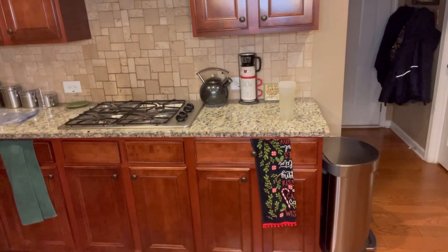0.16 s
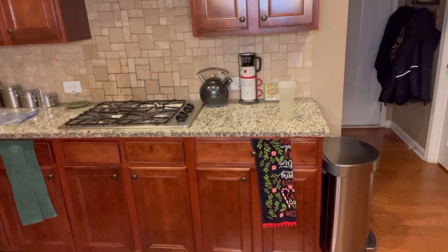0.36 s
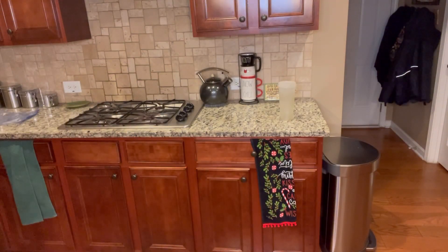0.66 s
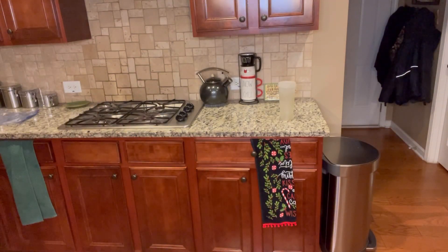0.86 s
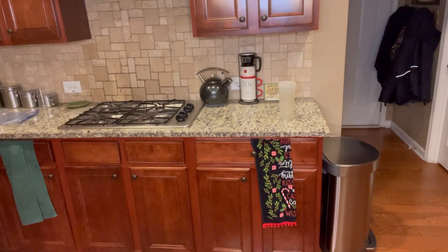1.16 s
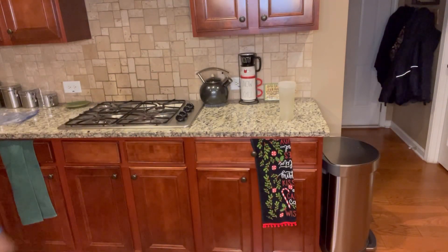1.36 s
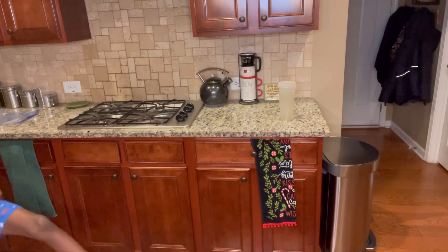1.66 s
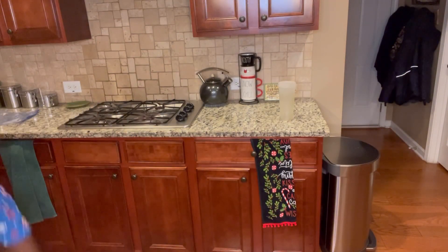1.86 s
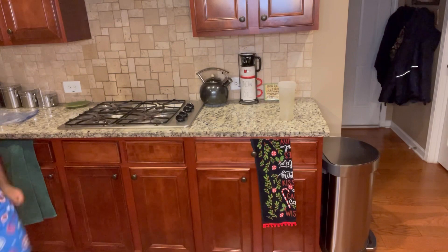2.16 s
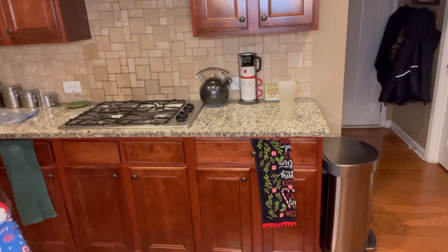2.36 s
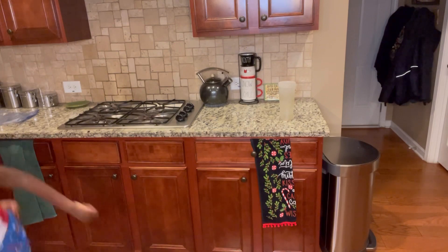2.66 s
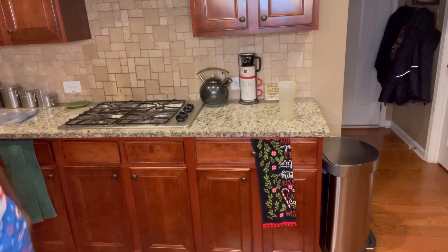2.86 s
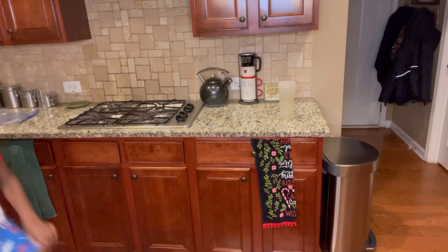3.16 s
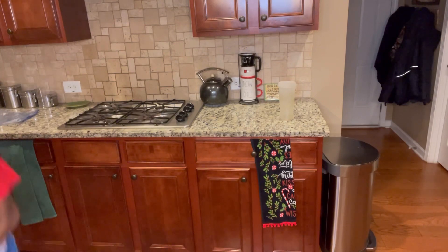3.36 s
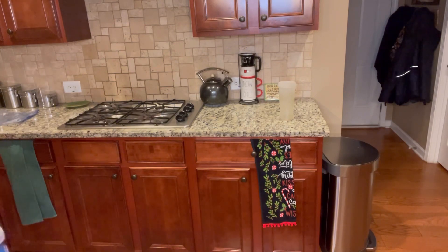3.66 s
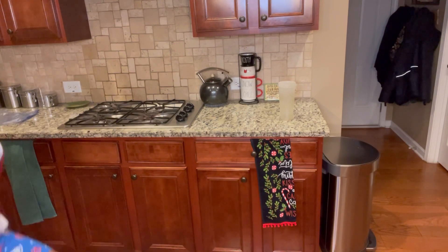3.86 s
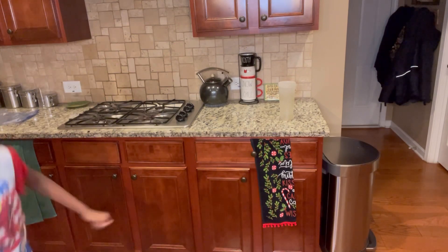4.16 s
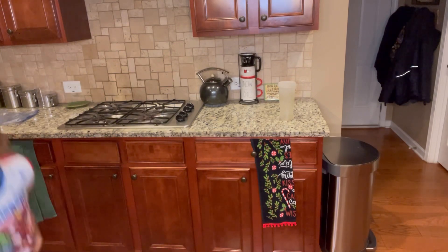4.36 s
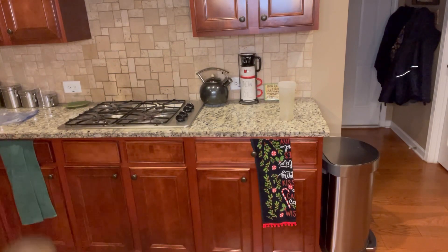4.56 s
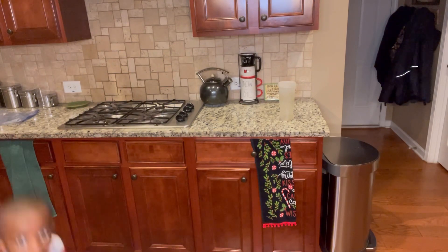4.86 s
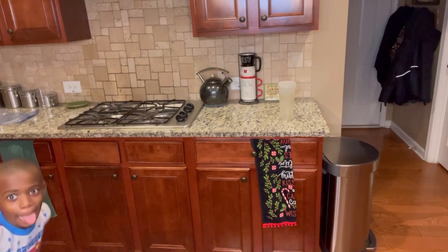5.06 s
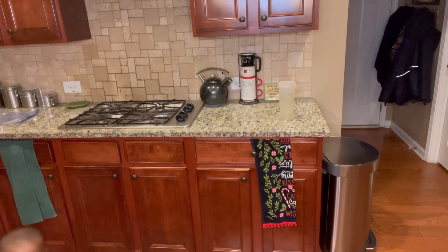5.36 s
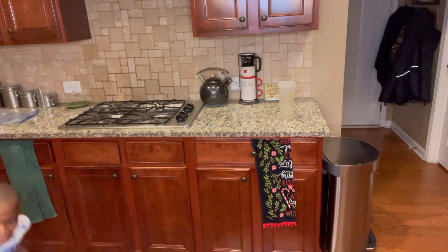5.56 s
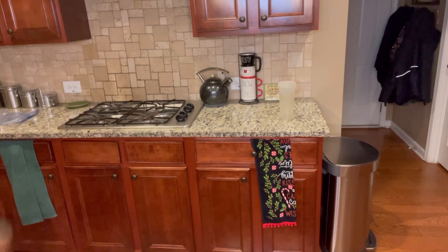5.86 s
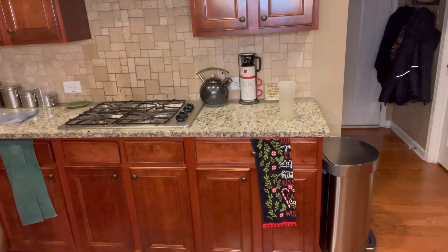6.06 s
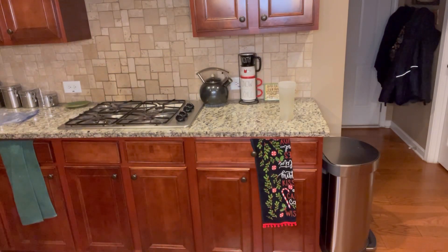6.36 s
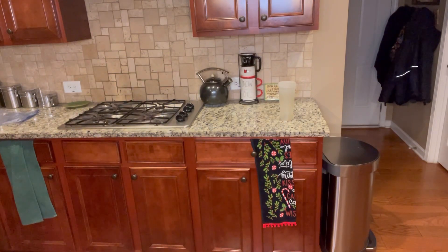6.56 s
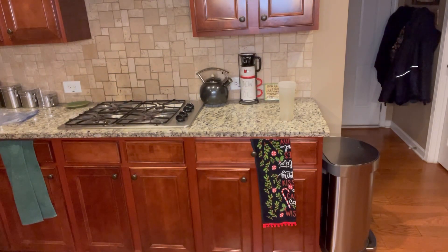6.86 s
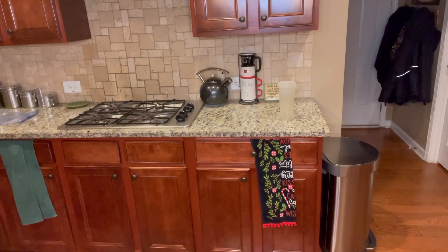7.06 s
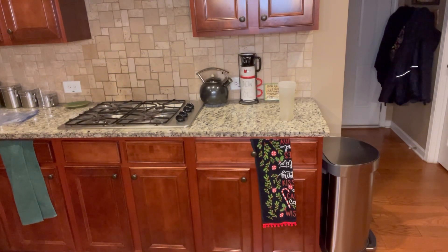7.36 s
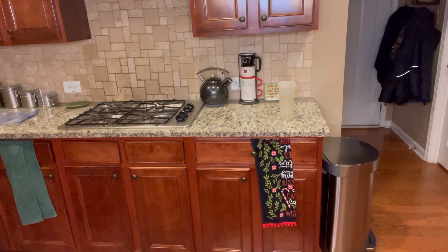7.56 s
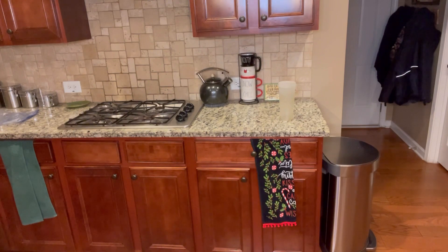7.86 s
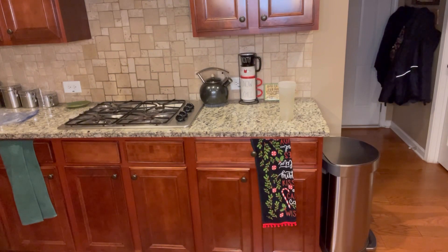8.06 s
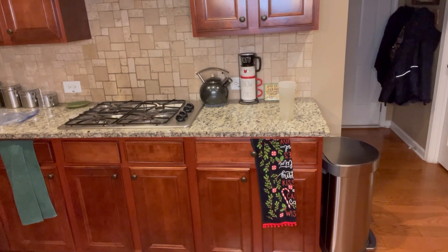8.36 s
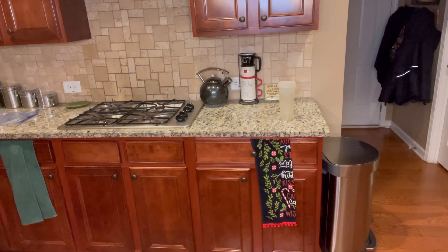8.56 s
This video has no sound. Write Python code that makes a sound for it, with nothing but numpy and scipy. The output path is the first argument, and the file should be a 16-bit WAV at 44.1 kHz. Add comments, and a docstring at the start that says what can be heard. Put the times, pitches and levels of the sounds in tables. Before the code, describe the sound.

In a hard tiled kitchen, wooden cupboard doors clack and tap unevenly while a drawer rumbles and cloth or packets rustle. Feet thud on floorboards. Knocks become closer and louder, peaking around the middle, then thin out into faint rubs and shuffles. Near the end a heavy door slams with a low boom and quick rebounds. Close phone-like stereo pickup with short bright room echoes.

```python
"""Low kitchen cupboards are searched near a phone, in a hard tiled room that echoes every blow as decaying noise.
From the start wooden doors clack amid bright hollow taps and scrapes, all ringing modes; a drawer rumbles in noise.
Cloth and packets rustle as brighter noise; then feet thud on floorboards, boards ringing under a softer attack.
From 1.5 s solid door edges knock close by; the clacks peak near 4 s, hollow sounds rub near 5.3 s and ring faintly
down near 6.3 s, and near 8 s a heavy door slams. A low tone comes and goes over dark noise: shuffles and house hush."""
import sys
import numpy as np
from scipy import signal
from scipy.fft import rfft, irfft, next_fast_len
from scipy.io import wavfile
from scipy.ndimage import uniform_filter1d, map_coordinates

SR = 44100
rng = np.random.default_rng(int(sys.argv[2]) if len(sys.argv) > 2 else 0)


def makeup_ratio(level_db):
    """Linear amplitude ratio for a level in decibels (20 dB per factor of ten)."""
    decades = np.asarray(level_db, float) / 20
    return 10 ** decades


def wav_record(signal):
    """Record a signal, one row per channel, as 16-bit PCM in the file named by sys.argv[1]."""
    frames = np.transpose(np.atleast_2d(signal))
    bounded = np.clip(frames, -1, 1)
    # unit amplitude maps onto the largest positive 16-bit level
    quanta = np.round(bounded * 32767).astype(np.int16)
    wavfile.write(sys.argv[1], SR, quanta)


N = 384552  # samples in the scene


def unit(x):
    """Scaled to rms 1."""
    return x / np.sqrt(np.mean(x ** 2) + 1e-20)


def along(points, hz):
    """Reads a curve of (frequency [Hz], value) points on a log frequency axis."""
    f, v = np.transpose(points)
    return np.interp(np.log(hz + 1), np.log(f + 1), v)


def wobble(rate):
    """A smooth random curve with rate knots a second."""
    knots = rng.standard_normal(int(N * rate / SR) + 4)
    return map_coordinates(knots, [np.arange(N) * rate / SR])


def filtered(x, response):
    """Filters x by a complex response of frequency."""
    m = next_fast_len(x.shape[-1] + 8192)
    spectrum = rfft(x, m) * response(np.fft.rfftfreq(m, 1 / SR))
    return irfft(spectrum, m)[..., :x.shape[-1]]


def ring(modes, centre_hz, spread, attack, t):
    """Modes near the struck spot's pitch ring most; strengths, phases and pitches are new each blow; peak 1."""
    hz, db, t60 = np.transpose(modes)[:, :, None]
    strength, phase, pitch = rng.standard_normal((3, len(modes), 1))
    db = db + 2 * strength - np.abs(spread) * np.log2(hz / centre_hz) ** 2
    hz = hz * (1 + 0.03 * pitch)  # loose parts never ring at quite the same pitch twice
    partials = makeup_ratio(db - 60 * t / t60) * np.sin(2 * np.pi * hz * t + phase)
    x = np.sum(partials, axis=0) * (1 - np.exp(-t / attack))
    return x / np.abs(x).max()


# colour of a hard contact: (frequency [Hz], level [dB per Hz])
CONTACT_COLOUR = [(530, -41), (900, -12), (1040, -6.5), (1600, -15), (2000, -16.5), (3080, -19),
                  (4960, -20), (6500, -22), (8000, -23), (13500, -34.5), (15600, -46)]


def crack(t60, tilt_db, t):
    """Hard contact: a sharp tick amid fading splinters, tilted in dB per octave above 1.2 kHz; peak 1."""
    ticks = rng.standard_normal(len(t)) ** 3 * makeup_ratio(-60 * t / t60) * .07
    ticks[24] += 1

    def colour(hz):
        tilt = tilt_db * np.log2(np.maximum(hz, 1200) / 3000)
        low_cut = 1 + (700 / (hz + 1)) ** 4
        return makeup_ratio(along(CONTACT_COLOUR, hz) + tilt) / low_cut

    x = filtered(ticks, colour)
    return x / np.abs(x).max()


# decay of the tiled room: (frequency [Hz], t60 [s])
ROOM_DECAY = [(60, .24), (120, .5), (250, .55), (1300, .68), (5000, .6), (11000, .38)]


def room(x, early_db):
    """Two unrelated echoes of one blow: near cabinet faces answer fast, then each frequency dies at its own speed."""
    hz, t, z = signal.stft(rng.standard_normal((2, int(.58 * SR))), SR, nperseg=256)
    late = makeup_ratio(-60 * t / along(ROOM_DECAY, hz)[:, None])
    late /= np.linalg.norm(late, axis=1, keepdims=True)  # equal energy at every pitch
    early = makeup_ratio(-60 * t / 0.057)
    early /= np.linalg.norm(early)
    tail = signal.istft(z * (late + makeup_ratio(early_db) * early), SR, nperseg=256)[1]
    delayed = np.pad(x, (150, 0))[None]
    return signal.fftconvolve(delayed, tail / np.linalg.norm(tail[0]), axes=1)


def place(out, s, hit, echo):
    """Adds one blow at s seconds: direct sound on track 0, its two echoes on tracks 1 and 2."""
    start = round(s * SR)
    out[0, start:][:len(hit)] += hit
    out[1:, start:][:, :echo.shape[1]] += echo


# cabinet and floor boom: (frequency [Hz], level [dB], t60 [s])
CARCASS_MODES = [(52, -11, 0.12), (64.7, -0.5, 0.2), (97, -2, 0.11), (121.5, 2, 0.14), (165, 1, 0.07)]
FLOOR_HZ, FRAME_HZ = 135, 64.4  # where floor and cabinet frame boom


def blows(rows, modes, damping, click_t60, attack, boom_attack, spread, early_db, click_room_db):
    """Struck wood: contact click, ringing panel and carcass boom, each blow with two room answers.

    Rows: (time [s], click [dB], wood [dB], boom [dB], click tilt [dB per octave], room [dB], wood [Hz], boom [Hz]).
    """
    out, t = np.zeros((3, N + 2 * SR)), np.arange(SR // 4) / SR
    damped = np.array(modes) / [1, 1, damping]  # shortens every t60
    for s, click_db, wood_db, boom_db, tilt_db, wet_db, wood_hz, boom_hz in rows:
        click = makeup_ratio(click_db) * crack(click_t60, tilt_db, t)
        body = makeup_ratio(wood_db) * ring(damped, wood_hz, spread, attack, t)
        body += makeup_ratio(boom_db) * ring(CARCASS_MODES, boom_hz, 9.2, boom_attack, t)
        echo = makeup_ratio(wet_db) * room(body + makeup_ratio(click_room_db) * click, early_db)
        place(out, s, body + click, echo)
    return out[:, :N]


# wooden panels and boards, also rung by knocks and feet: (frequency [Hz], level [dB], t60 before damping [s])
WOOD_MODES = [(215, -4.5, 0.13), (272, -7, 0.14), (312, -4, 0.16), (385, -4, 0.07), (455.3, -1.5, 0.076),
              (545, -7, 0.086), (578, 2, 0.03), (679.5, 0, 0.053), (779, 9.5, 0.02), (864, 9, 0.013),
              (994, -5.5, 0.085), (1120, -5.5, 0.019), (1260, -0.5, 0.023), (1480, 20.5, 0.012),
              (1700, -5, 0.029), (2050, -9.5, 0.013), (2390, 3.5, .012), (2900, 12.5, .01)]
# door and catch contacts: (time [s], click level [dB], panel level [dB], panel centre [Hz],
# click tilt [dB per octave])
DOOR_CLACKS = [(0.104, -56, -45, 826, 2.5), (0.14, -39, -37, 694, 12), (0.294, -18, -35, 664, -5.5),
               (0.4066, -57, -30, 336, 0), (0.4455, -19, -29, 654, -1), (0.4555, -28, -26.5, 800, -4),
               (0.4951, -20.5, -31, 568, -2), (0.551, -34, -31, 700, -7), (0.6376, -26, -30, 405, -3.5),
               (0.655, -26, -30.5, 384, -7), (0.7019, -20, -29, 1500, -9), (1.1127, -22.5, -58.5, 598, 4),
               (1.348, -39, -60, 420, 5.5), (1.464, -30.5, -40, 864, -9.5), (1.667, -40, -60, 600, -2),
               (1.687, -30, -34.5, 690, -1), (1.699, -43, -39, 450, -4), (1.8112, -48, -56, 450, 5),
               (2.163, -43, -57, 433, 0), (2.1997, -55, -50, 595, -7), (2.485, -26.5, -63, 685, -2),
               (2.646, -32.5, -37.5, 500, -7.5), (2.84, -28.5, -46, 403, -2.5),
               (3.0795, -31.5, -53, 431, -0.5), (3.159, -19, -40, 780, 0.5), (3.1624, -18, -26, 760, 4),
               (3.168, -25, -35, 800, 1), (3.193, -33.5, -37, 640, 0.5), (3.352, -47, -32.5, 694, -7),
               (3.569, -22.5, -28, 560, -12), (3.575, -18, -23, 470, -12.5),
               (3.63, -37.5, -29.5, 280, -7.5), (3.643, -25.5, -22.5, 267, -12.5),
               (3.6783, -13, -18, 594, -6), (3.682, -7, -11, 525, -7.5), (3.714, -23.5, -28, 447, -5.5),
               (3.8714, -11.5, -21.5, 700, -1.5), (3.9489, -27.5, -27, 401, -2),
               (4.0389, -4.5, -7.5, 640, -1), (4.0443, -11.5, -10, 484, -8), (4.056, -22.5, -12.5, 710, -4),
               (4.09, -30, -24.5, 800, -5), (4.112, -29, -26.5, 560, -6), (4.2134, -16.5, -42.5, 800, 0),
               (4.4133, -20, -50, 606, 3.5), (4.42, -31, -36, 560, -11), (4.428, -26.5, -35, 600, -0.5),
               (4.733, -53, -32, 604, 12), (4.742, -49, -37, 480, 4), (4.795, -42, -37.5, 485, -1),
               (4.979, -34.5, -46, 600, -1), (5.44, -21, -42.5, 401, 2), (5.463, -23, -37, 330, -1.5),
               (5.511, -40, -37, 350, -1), (6.096, -37, -43.5, 450, -1.5), (6.7387, -32.5, -47, 1700, 1),
               (6.905, -57, -57, 401, -0.5), (7.6832, -28, -46, 400, -8), (7.827, -24.5, -30, 413, -0.5),
               (7.862, -39, -28, 640, -7), (8.522, -45.5, -48, 683, -10), (8.6504, -29, -37, 786, -5)]


def doors():
    """Catches click, panels knock and faintly shake the carcass; louder knocks are nearer, so drier."""
    rows = [(s, click, panel, panel - 24, tilt, 3 - 0.2151 * (panel + 30), hz, FLOOR_HZ)
            for s, click, panel, hz, tilt in DOOR_CLACKS]
    return blows(rows, WOOD_MODES, damping=1.5, click_t60=0.008, attack=0.0008, boom_attack=.009,
                 spread=16, early_db=-7, click_room_db=-2.5)


# the heavy door: (frequency [Hz], level [dB], t60 before damping [s])
HEAVY_DOOR_MODES = [(124, -7, .12), (150, -11, .1), (190, -11, .08), (230, -5, .08), (272, -1, .1),
                    (310, -3, .09), (350, -4, .08), (404, -3, .1), (450, -6, .07), (520, -6, .06),
                    (592, -1, .11), (652, -3, .08), (720, -11, .05), (850, -13, .04), (1000, -16, .04)]
# the catch touches just before the slam: (time [s], click level [dB], panel level [dB])
CATCH_TOUCH = (7.9445, -8, -19)
# the slam and its rebounds: (time [s], panel level [dB], boom level [dB], click level [dB], panel centre [Hz])
SLAM_HITS = [(7.957, -2.5, -7.5, -12.5, 550), (7.964, -15, -15, -22, 302), (7.979, -7, -11, -13.5, 603),
             (8.004, -16.5, -14.5, -16.5, 600), (8.03, -14, -22, -23.5, 640), (8.05, -20, -32.5, -34, 640)]


def slam():
    """The heavy door meets its catch, hits its frame and rebounds, booming low in the frame."""
    rows = [(*CATCH_TOUCH, -60, -3, -3, 600, FRAME_HZ)]
    rows += [(s, click, panel, boom, -1.5, -2.5, hz, FRAME_HZ) for s, panel, boom, click, hz in SLAM_HITS]
    return blows(rows, HEAVY_DOOR_MODES, damping=1.1, click_t60=0.018, attack=0.0015, boom_attack=.004,
                 spread=2, early_db=-3, click_room_db=6)


# solid door edges meet the frame close by: (time [s], click level [dB], wood level [dB], wood centre [Hz],
# click tilt [dB per octave])
EDGE_KNOCKS = [(1.5234, -40, -20.5, 259, -4), (3.359, -38, -24, 700, -7), (3.3636, -24.5, -14.5, 680, -7.5),
               (3.382, -46, -21.5, 560, -4.5), (3.395, -45, -33, 333, -4), (5.158, -36, -21.5, 416, -3),
               (5.178, -45, -25, 300, -3)]


def knocks():
    """Solid wood on solid wood: short-ringing wood with some boom and room."""
    boom_db, room_db = -23.5, -0.5  # boom is relative to the wood
    rows = [(s, click, wood, wood + boom_db, tilt, room_db, hz, FLOOR_HZ)
            for s, click, wood, hz, tilt in EDGE_KNOCKS]
    return blows(rows, WOOD_MODES, damping=1.9, click_t60=0.0092, attack=0.0006, boom_attack=.006,
                 spread=11, early_db=-2, click_room_db=3.5)


# footfalls and dull bumps: (time [s], board level [dB], boom level [dB], slap level [dB], board centre [Hz])
FOOTFALLS = [(0.869, -25.5, -42, -25, 286), (0.872, -18.5, -43, -30, 282), (0.889, -20.5, -37, -28, 295),
             (0.953, -30, -49, -40, 280), (1.513, -30, -29, -32, 596), (1.526, -35, -38, -33, 219),
             (1.927, -45, -60, -37, 500), (1.935, -37.5, -37, -48, 312), (2.281, -41, -57, -32.5, 500),
             (2.291, -34, -40, -50, 242), (2.659, -35.5, -44.5, -63, 307), (2.974, -27.5, -39, -28, 530),
             (2.99, -31.5, -29.5, -50, 248), (4.481, -27.5, -34, -47, 560), (4.487, -29, -32, -52, 248),
             (4.51, -32.5, -39, -50, 420), (5.145, -33, -46, -44.5, 596), (5.165, -31, -29, -38, 252),
             (5.2, -45, -33, -55, 230), (5.539, -43, -48, -52, 304), (5.783, -54, -38.5, -55.5, 228),
             (5.818, -49, -40, -44, 300), (5.838, -58, -37, -58, 220), (5.88, -55, -46, -60, 220),
             (6.259, -56, -44, -48, 203), (7.254, -38, -69, -66, 297), (7.603, -25.5, -32.5, -40, 290),
             (7.63, -33, -37, -48, 350), (7.66, -34, -41, -51, 330), (7.695, -33, -49, -49, 300)]


def feet():
    """Soft contacts on floorboards: a slow start and a longer slap."""
    rows = [(s, slap, board, boom, -.3, 1.5, hz, FLOOR_HZ) for s, board, boom, slap, hz in FOOTFALLS]
    return blows(rows, WOOD_MODES, damping=1.1, click_t60=0.021, attack=0.0015, boom_attack=0.011,
                 spread=15, early_db=-7.5, click_room_db=2.5)


# thin hollow walls: (frequency [Hz], level [dB], t60 [s])
THIN_WALL_MODES = [(560, 3, .03), (614, -3.5, 0.047), (690, 1.5, 0.083), (755, -15, 0.026),
                   (1105, 12, 0.036), (1460, 5.5, 0.035), (1550, -1, 0.03), (1710, 3.5, 0.052),
                   (1960, -2, 0.084), (2103, 1, 0.031), (2424, -4, 0.033), (2600, -4, 0.039),
                   (2800, -3.5, 0.028), (3060, -8, 0.038), (3300, -2, 0.025), (3460, 4, 0.018),
                   (4400, 4, 0.015), (5100, -9, 0.02)]
# bright hollow sounds: taps, a scrape, a rub and a faint falling ring: (time [s], level [dB], centre [Hz])
HOLLOW_NOTES = [(.142, -37, 670), (.222, -36, 597), (.233, -35, 700), (.246, -40, 640), (.27, -50, 660),
                (.297, -30, 685), (.305, -36, 676), (.294, -34.5, 1810), (.295, -38, 4400),
                (.296, -46, 5100), (.446, -38, 4400), (.495, -35.5, 2600), (0.7014, -30.5, 1600),
                (.7025, -33.5, 2680), (.712, -38, 3100), (0.722, -38, 1800), (0.732, -36, 1600),
                (0.751, -43, 1550), (0.769, -44, 1500), (.795, -44, 1450), (.869, -34, 2730),
                (1.516, -35, 1120), (2.283, -46, 3300), (3.079, -38.5, 4440), (3.08, -50, 2100),
                (3.163, -39, 3020), (3.166, -38, 4400), (3.173, -43, 3240), (5.271, -39, 1500),
                (5.283, -37.5, 1700), (5.305, -39, 1710), (5.328, -46, 1750), (5.437, -39, 1390),
                (5.44, -38.5, 2120), (5.46, -41, 2100), (6.27, -61, 1890), (6.32, -60, 1830),
                (6.379, -64, 1765), (6.441, -66, 1760), (6.74, -47, 2390), (6.742, -47, 3400),
                (6.741, -58, 1700), (6.8615, -53, 2300), (7.943, -25, 2200), (7.95, -22.5, 2090)]


def hollow_things():
    """Light hollow things ring briefly, mostly well above the wood; close notes blur into a scrape or a rub."""
    out, t = np.zeros((3, N + SR)), np.arange(SR // 8) / SR
    for s, db, hz in HOLLOW_NOTES:
        note = makeup_ratio(db) * ring(THIN_WALL_MODES, hz, 60, 0.0012, t)
        place(out, s, note, makeup_ratio(5) * room(note, early_db=-0.5))
    return out[:, :N]


def rush(spectrum, patchy_db, grain_db):
    """Two unrelated noises with shared patches of gain and sparse spiky grains; rms 1."""
    grains = makeup_ratio(grain_db * rng.exponential(size=N // 64 + 1)).repeat(64)[:N]
    z = signal.stft(rng.standard_normal((2, N)) * grains, nperseg=512)[2]
    field = uniform_filter1d(rng.standard_normal(z.shape[1:]), 8, 0)  # smooth over frequency
    field = uniform_filter1d(field, 10, 1)  # then over time
    pair = signal.istft(z * makeup_ratio(patchy_db * unit(field)), nperseg=512)[1][:, :N]
    return unit(filtered(pair, lambda hz: makeup_ratio(along(spectrum, hz))))


def strokes(rows, rise_db_per_s, fall_db_per_s):
    """One gain curve per (start, hold, dB) row on a 1 ms grid: swell up to the start, hold, die away."""
    s, hold, db = np.transpose(rows)[:3, :, None]
    t = np.arange(0, N / SR, .001)
    jolt_s = 0.087  # strokes held shorter than this are jolts and start faster
    rise = rise_db_per_s * np.maximum(1, jolt_s / np.maximum(hold, .01))
    return makeup_ratio(db - rise * np.maximum(s - t, 0) - fall_db_per_s * np.maximum(t - s - hold, 0))


def joined(gains):
    """Strokes add in power; one gain per sample."""
    total = np.linalg.norm(gains, axis=0)
    return np.interp(np.linspace(0, len(total) - 1, N), np.arange(len(total)), total)


# colour of cloth and packets: (frequency [Hz], level [dB per Hz])
RUSTLE_COLOUR = [(470, -33.5), (800, -10), (1300, -2.5), (1400, -3), (3180, -8), (4850, -11), (6500, -13.5),
                 (7500, -18), (12000, -22.5), (14500, -30), (15600, -30)]
# cloth and packets handled or shaken: (start [s], hold [s], level [dB], brightness [dB])
RUSTLE_STROKES = [(0.05, 0.091, -66, -1.5), (0.134, 0.33, -55.5, -5.5), (0.528, 0.3, -51, -3.5),
                  (0.873, 0.036, -38.5, 4), (1.102, 0.18, -60, 4), (1.23, 0.02, -65.5, 16.5),
                  (1.442, 0.096, -58.5, -8), (1.51, 0.011, -45, -7.5), (1.62, 0.09, -59, -3),
                  (1.928, 0.38, -78.5, 14), (2.511, 0.45, -44.5, 1.5), (3.06, 0.1, -59, -3),
                  (3.157, 0.014, -50.5, -2.5), (3.218, 0.18, -75, -4), (3.355, 0.27, -55, -1),
                  (3.528, 0.13, -49.5, -2), (3.544, 0.032, -35, 4), (3.568, 0.075, -37, 0.5),
                  (3.678, 0.017, -45, -15), (3.877, 0.42, -46.5, 0.5), (4.036, 0.0067, -28, 0),
                  (4.12, 0.13, -39, 0.5), (4.295, 0.14, -41, 2), (4.489, 0.13, -40, 2),
                  (4.675, 0.19, -48, -0.5), (4.944, 0.11, -57, 4), (5.138, 0.18, -43.5, 1),
                  (5.344, 0.2, -43, 1), (5.592, 0.091, -51, 2.5), (5.66, 0.073, -65, 2),
                  (5.74, 0.15, -47.5, 3), (5.987, 0.14, -61.5, -2), (6.15, 0.056, -73.5, 11),
                  (6.3, 0.059, -91, 2.5), (6.678, 0.11, -68, 9.5), (6.758, 0.028, -60.5, 1.5),
                  (6.8, 0.096, -62.5, 4.5), (6.913, 0.068, -49.5, 1.5), (7.07, 0.42, -70.5, 11),
                  (7.253, 0.09, -66.5, 11.5), (7.355, 0.26, -65.5, 16), (7.628, 0.11, -62.5, -8),
                  (7.826, 0.03, -44.5, 0.5), (7.945, 0.017, -42.5, 6), (8.05, 0.02, -64, -18),
                  (8.53, 0.062, -77, -16.5), (8.632, 0.051, -58.5, -6.5)]


def rustling():
    """Handled cloth and packets: grainy noise whose brightness lifts the treble and lowers the rest."""
    hands = strokes(RUSTLE_STROKES, rise_db_per_s=592.5, fall_db_per_s=122.5)
    bright = makeup_ratio(np.transpose(RUSTLE_STROKES)[3][:, None])
    noise = rush(RUSTLE_COLOUR, patchy_db=1.6, grain_db=1.7)
    fizz = filtered(noise, lambda hz: 1 / (1 + (4500 / (hz + 1)) ** 2))  # crisp packets are brighter than cloth
    mix = joined(hands / bright) * (noise - fizz) + joined(hands * bright) * fizz
    return makeup_ratio(1.2 * wobble(25)) * mix


# colour of the drawer box: (frequency [Hz], level [dB per Hz])
RUNNER_COLOUR = [(88, -43), (150, -34), (177, -8.5), (331, 0.5), (367, -2), (447, -1), (517, -4.5),
                 (684, -3.5), (975, -10.5), (1390, -18), (1800, -19), (2600, -24), (4200, -46.5),
                 (8000, -120)]
# the drawer box slides or is jolted: (start [s], hold [s], level [dB])
DRAWER_STROKES = [(.1, 0.19, -53), (.32, 0.48, -44.5), (.88, 0.046, -38.5), (1.0, 0.33, -48.5),
                  (1.515, 0.013, -37), (1.65, 0.1, -58), (2.2, 0.19, -52.5), (2.52, 0.066, -39),
                  (2.6, 0.045, -42), (2.7, 0.085, -49), (2.85, 0.045, -47), (2.98, 0.01, -42),
                  (3.08, 0.16, -63), (3.41, 0.033, -65), (3.54, 0.13, -39), (3.97, 0.12, -44),
                  (4.06, 0.074, -33), (4.2, 0.062, -39.5), (4.38, 0.1, -42.5), (4.52, 0.1, -44),
                  (4.75, 0.12, -51), (5.17, 0.08, -42.5), (5.28, 0.07, -46.5), (5.43, 0.17, -46.5),
                  (5.75, 0.13, -51.5), (6.0, 0.49, -69.5), (6.79, 0.055, -55.5), (6.92, 0.071, -51.5),
                  (7.05, 0.69, -51.5), (7.27, 0.53, -48.5), (7.65, 0.046, -39.5), (7.8, 0.073, -47),
                  (7.955, 0.036, -22.5), (8.47, 0.21, -52.5)]


def drawer():
    """The drawer box rumbles on its runners: box-coloured noise with an uneven level."""
    slide = joined(strokes(DRAWER_STROKES, rise_db_per_s=298, fall_db_per_s=107.5))
    return slide * makeup_ratio(2 * wobble(30)) * rush(RUNNER_COLOUR, patchy_db=1.4, grain_db=1.2)


# colour of shuffling feet: (frequency [Hz], level [dB per Hz])
SHUFFLE_COLOUR = [(15, -77.5), (25, -37), (43, -42), (65, -6.5), (123, -2.5), (150, -9), (183, -10),
                  (260, -4.5), (340, -20), (570, -120)]
# weight shifts on the floorboards: (start [s], hold [s], level [dB])
WEIGHT_SHIFTS = [(0, 0.048, -55), (.52, 0.27, -50), (.885, 0.043, -33), (1.2, 0.31, -51.5),
                 (1.52, 0.098, -42), (1.95, 0.094, -56), (2.35, 0.19, -60), (2.62, .06, -50),
                 (2.8, .1, -54.5), (3.4, 0.22, -75), (3.64, 0.054, -44), (4.05, 0.25, -55),
                 (4.52, 0.072, -47.5), (4.92, 0.075, -58), (5.28, 0.35, -54.5), (5.7, 0.98, -65),
                 (6.82, 0.75, -55.5), (7.58, 0.39, -52), (8.0, 0.1, -41), (8.3, 0.32, -55),
                 (8.65, 0.11, -53)]


def shuffling():
    """Feet shift their weight on the boards: low, nearly smooth noise."""
    weight = joined(strokes(WEIGHT_SHIFTS, rise_db_per_s=196.5, fall_db_per_s=98))
    return weight * rush(SHUFFLE_COLOUR, patchy_db=1, grain_db=.2)


# a steady low tone, perhaps air in the open cupboard: (frequency [Hz], wander [Hz])
LOW_TONE = (345, 4.06)
# when the low tone sounds: (start [s], hold [s], level [dB])
HUM_STROKES = [(.41, 0.25, -46.5), (.76, 0.12, -46.5), (.885, 0.022, -32), (1.02, 0.027, -43.5),
               (1.07, 0.16, -51.5), (1.22, 0.027, -46), (1.27, 0.05, -44.5), (2.8, 0.072, -51),
               (3.6, 0.36, -50.5), (4.05, 0.056, -43), (4.68, 0.067, -54), (5.28, 0.062, -55),
               (6.95, .12, -56.5), (7.25, .3, -55), (7.66, 0.042, -42.5), (7.8, 0.2, -55),
               (8.52, 0.031, -48.5)]


def low_hum():
    """A sine of slightly wandering pitch, with its own phase at each port."""
    centre_hz, wander_hz = LOW_TONE
    cycles = np.cumsum(centre_hz + wander_hz * wobble(16)) / SR
    hum = unit(np.sin(2 * np.pi * (cycles + rng.random((2, 1)))))
    return hum * makeup_ratio(2 * wobble(12)) * joined(strokes(HUM_STROKES, rise_db_per_s=200, fall_db_per_s=200))


# colour of the quiet house: (frequency [Hz], level [dB per Hz])
HUSH_COLOUR = [(15, -57.5), (25, -27.5), (53, -7), (75, -6.5), (94, -17), (129, -8.5), (260, -25),
               (401, -17), (617, -24), (1760, -37), (5000, -50.5), (15600, -63)]


def house_hush():
    """The hush of the house: faint, mostly low noise throughout."""
    return makeup_ratio(-57.0) * rush(HUSH_COLOUR, patchy_db=1.5, grain_db=1.5)


# left-right likeness of diffuse sound: (frequency [Hz], likeness [0 to 1])
LIKENESS = [(60, 1), (150, 0.83), (400, 0.32), (800, 0.27), (1500, 0.1), (4000, 0.025), (7500, 0.71),
            (12000, 1)]
# spaced ports, for sound from the far cupboards: (frequency [Hz], left leads by [radians])
FAR_LEAD = [(0, 0), (270, -1), (600, -1.5), (1050, -3), (1400, -3.5), (1900, -4.5), (3000, -4.5),
            (6000, -3.6), (7000, -5), (8200, -2.5), (10000, -1), (11000, -1.5), (15000, 1.3)]
# the same for the person close by: (frequency [Hz], left leads by [radians])
NEAR_LEAD = [(0, 0), (270, 0.05), (600, 1), (1050, 1.88), (1400, 1.5), (2600, 1.4), (4000, 1.2),
             (6000, 2.5), (7000, 3.3), (8200, 4), (10000, 5), (11000, 6), (15000, 7)]
# the person close by is the one heard: (from [s], to [s])
NEAR_SPANS = [(.43, .62), (1.9, 2.46), (2.95, 4.7), (5.11, 5.27), (5.58, 5.76)]


def scene():
    """Diffuse sound is partly alike at the two ports; delay and balance follow where the sound comes from."""
    direct, *echoes = doors() + slam() + knocks() + feet() + hollow_things()
    diffuse = echoes + (rustling() + drawer() + shuffling() + low_hum() + house_hush())

    def likeness(hz):
        turn = np.arccos(np.clip(along(LIKENESS, hz), 0, 1)) / 2
        return np.array([np.cos(turn), np.sin(turn)])

    same, other = filtered(diffuse, likeness)
    left, right = direct + same + other, direct + same - other

    t = np.arange(N) / SR
    near = sum(1. * (t > a) * (t < b) for a, b in NEAR_SPANS)
    near = uniform_filter1d(near, size=SR // 50)  # 20 ms crossfades

    def lag(hz):
        leads = [np.interp(hz, *np.transpose(points)) for points in (FAR_LEAD, NEAR_LEAD)]
        return np.exp(-1j * np.array(leads))

    far_right, near_right = filtered(right, lag)
    far_pan_db, near_pan_db = -0.8, -0.35  # left over right
    pan = makeup_ratio((far_pan_db * (1 - near) + near_pan_db * near) / 2)
    return np.array([left * pan, ((1 - near) * far_right + near * near_right) / pan])


def band_limit(x):
    """A steep low-pass at the top of the band."""
    return signal.sosfilt(signal.butter(12, 15770, fs=SR, output="sos"), x)


def record(dry):
    """The microphones drop the deepest bass, below about 44 Hz, and round off the hardest peaks."""
    x = filtered(dry, lambda hz: (1j * hz / (44 + 1j * hz)) ** 2)
    x = x / (1 + np.abs(x / .92) ** 6) ** (1 / 6)
    return band_limit(x)


dry = scene()
out = record(dry)
wav_record(out)
```